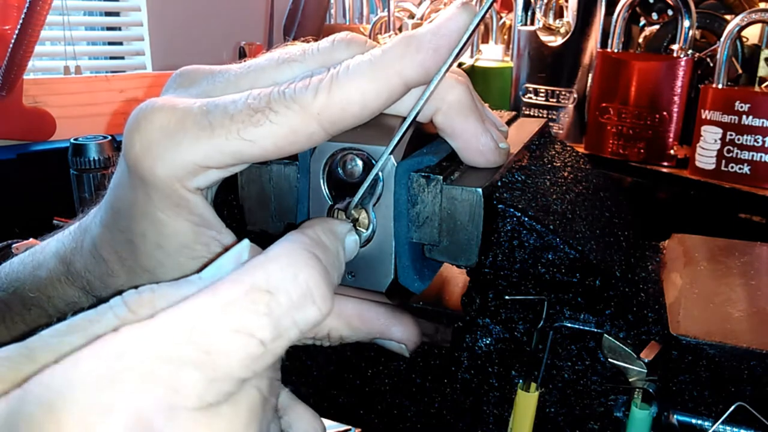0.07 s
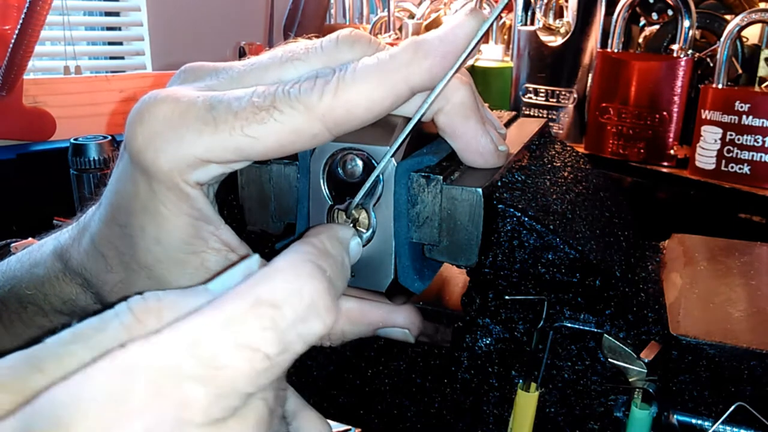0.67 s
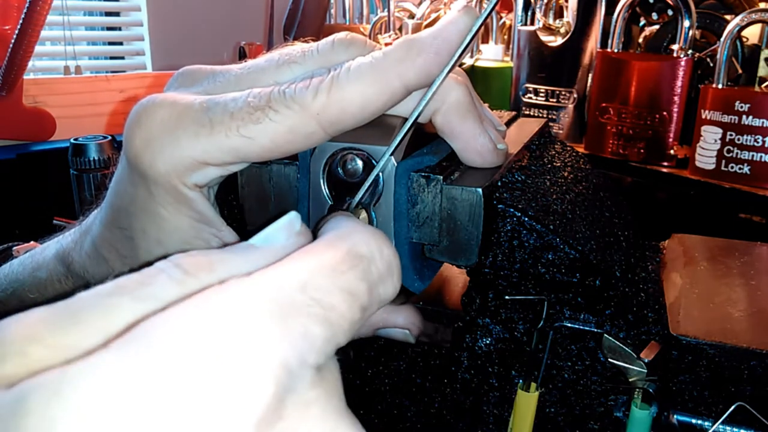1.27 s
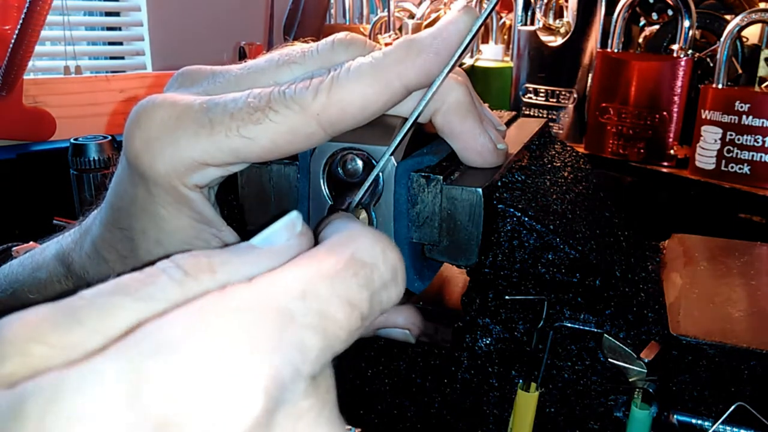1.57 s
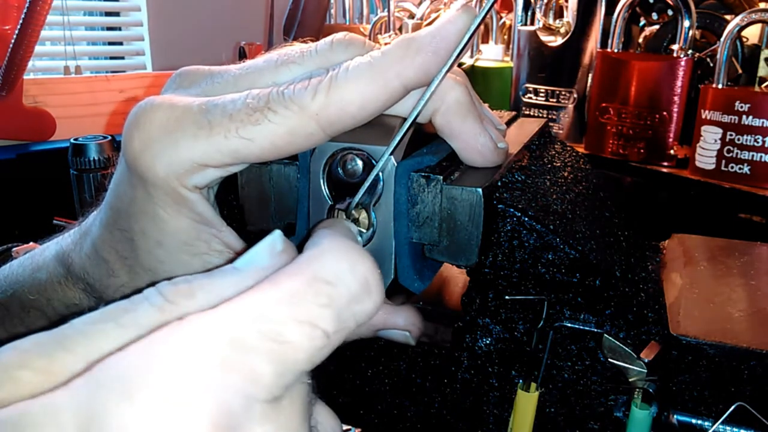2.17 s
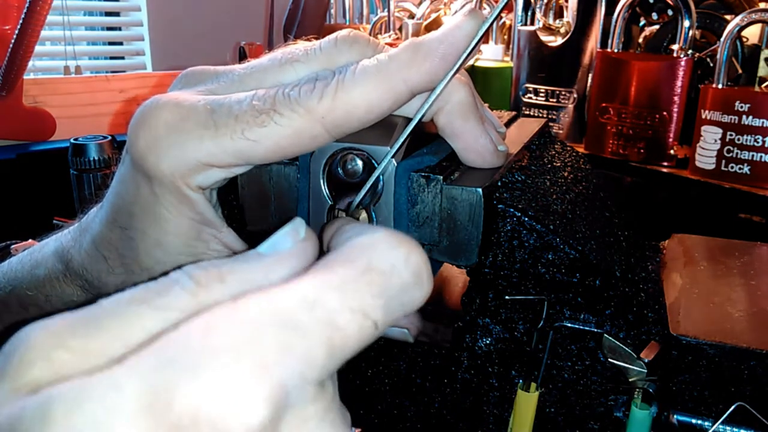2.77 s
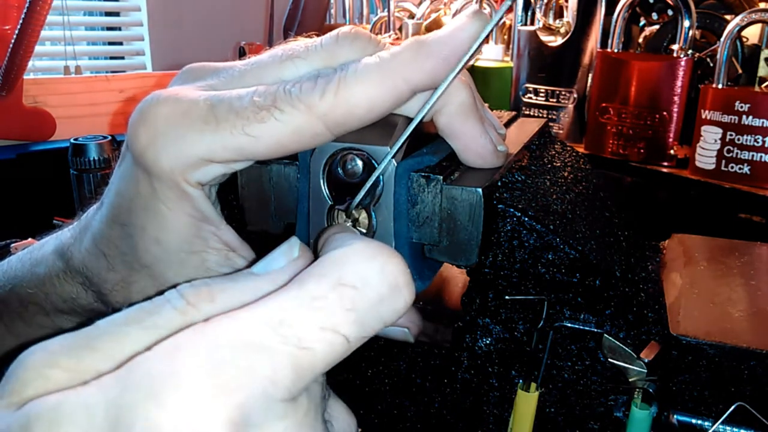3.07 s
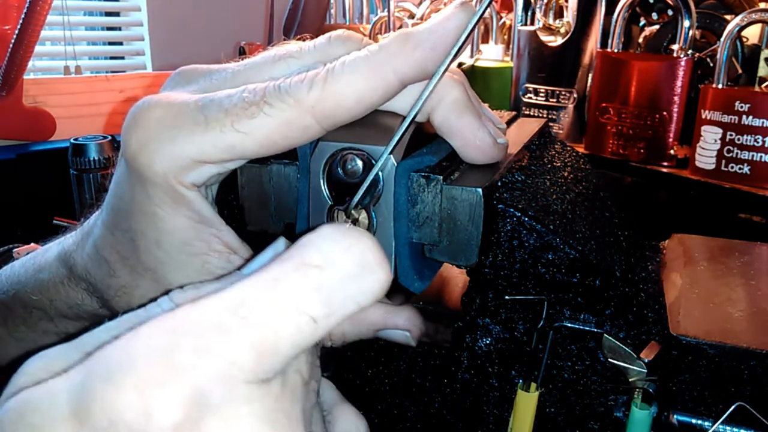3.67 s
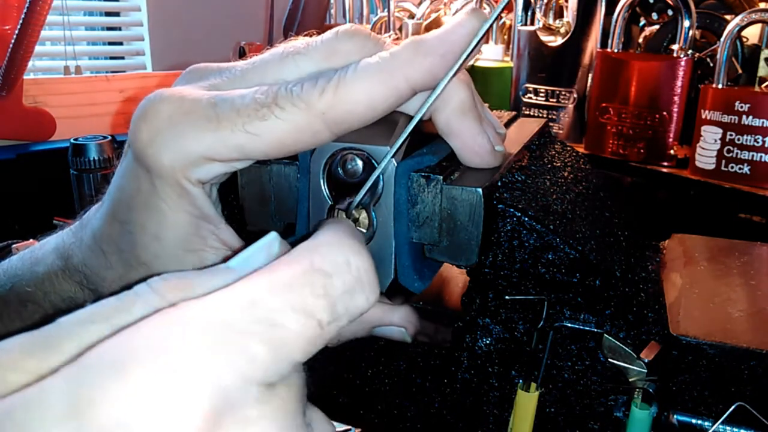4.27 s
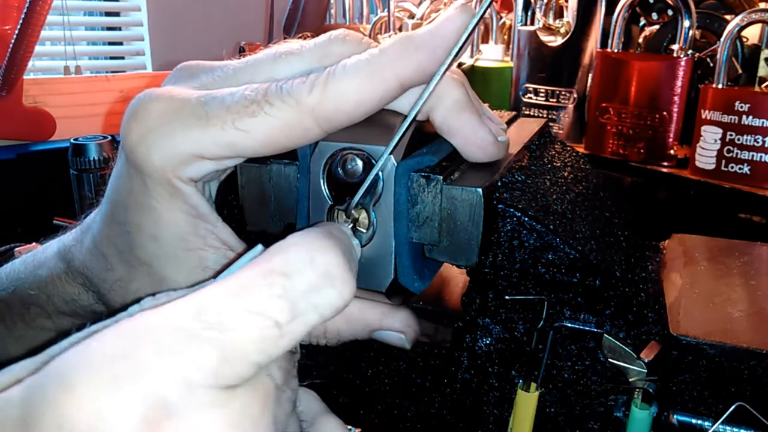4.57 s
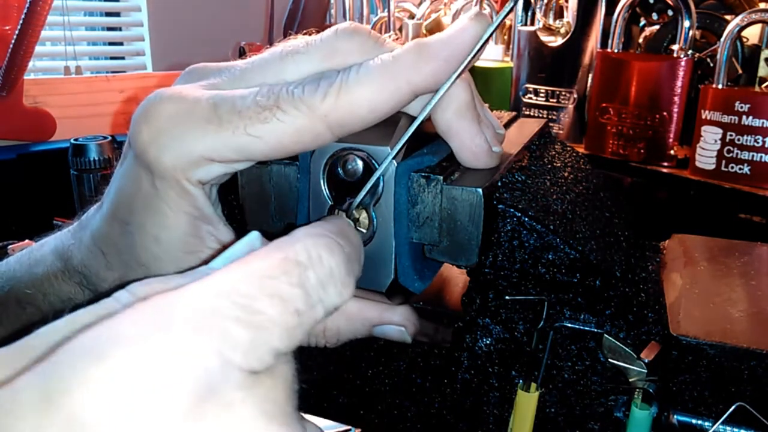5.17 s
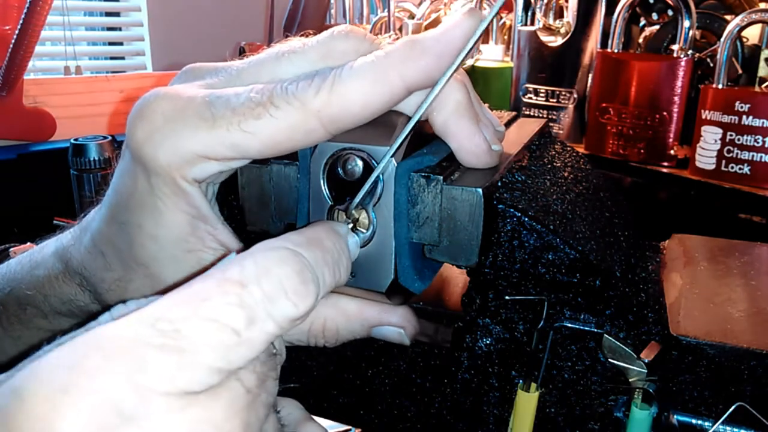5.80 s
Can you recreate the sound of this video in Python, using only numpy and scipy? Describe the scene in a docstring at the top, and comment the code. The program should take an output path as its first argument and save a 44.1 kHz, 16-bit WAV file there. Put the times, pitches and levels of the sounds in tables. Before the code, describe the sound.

A steel pick works the pins of a padlock clamped in a vise, making sharp, bright clicks at uneven intervals, some in pairs, some with a small dull knock underneath. Midway the tension wrench springs with a tiny ring. Near the end something briefly brushes the right side of the close stereo microphone with a low bump, and a few more clicks follow. Faint hum, rumble and hiss fill the small room.

```python
"""A small room: a steel pick works the pins of a padlock held in a vise, close to a stereo microphone.
Each pin lets go with a short chatter of steel on brass that rings the steel and jolts the vise.
The tension wrench springs once, hands drag on the lock, and once something brushes the right port.
Under it lie a low wavering hum, room rumble and the microphone's hiss."""
import sys
import numpy as np
from scipy import signal
from scipy.fft import rfft, irfft, next_fast_len
from scipy.io import wavfile
from scipy.ndimage import uniform_filter1d, map_coordinates

SR = 44100
rng = np.random.default_rng(int(sys.argv[2]) if len(sys.argv) > 2 else 0)


def store_pcm(level_fs):
    """Save levels as 16-bit WAV."""
    pcm = np.round(np.clip(level_fs, -1, 1) * 32767).astype(np.int16)
    wavfile.write(sys.argv[1], SR, np.atleast_2d(pcm).T)


N = 266143

# hum tones: f/Hz, level/dB, unsteady share
HUM_TONES = [(59.4, -52, 0.23), (228.8, -66, 0.61), (8302, -75.5, 0.74)]
# room rumble: f/Hz, relative density/dB
RUMBLE_SPECTRUM = [(20, -9), (35, -14), (55, 16), (75, 0), (100, 0), (140, 0.5), (175, -1), (215, -1.5),
                   (260, -9), (350, -11.5), (500, -15.5), (1000, -22.5), (2000, -55), (5000, -55)]
# rumble likeness at the two ports: f/Hz, correlation
RUMBLE_COHERENCE = [(60, 0.91), (130, 0.96), (290, 0.657), (640, 0.25), (1400, 0)]
# microphone hiss: f/Hz, relative density/dB
HISS_SPECTRUM = [(200, -8), (1500, -7), (4400, -5), (5600, -1.5), (6700, -5), (8200, -2), (10200, 0),
                 (12000, -3.5), (14100, -6), (14450, -36), (14900, -90)]
# room decay: f/Hz, t60/s
ROOM_DECAY = [(200, 0.86), (700, 0.25), (3000, 0.21), (8000, 0.27), (11000, 0.19), (15000, 0.22)]
# hand shifts: firmest drag t/s, relative level/dB, length/s
HAND_SHIFTS = [(1.836, -59, 0.12), (1.99, -58.5, 0.14), (2.673, -54.5, 0.049), (2.745, -65.5, 0.047),
               (4.51, -60, 0.09)]
# skin on the lock: f/Hz, relative density/dB
SKIN_SPECTRUM = [(120, -27), (270, -10), (370, 2), (520, -20), (850, -16), (1500, -42), (4000, -51)]
# scratch across the port: f/Hz, relative density/dB
SCRATCH_SPECTRUM = [(100, -23), (300, -8), (700, -8.5), (1400, -8.5), (1900, -2), (2500, -3), (3100, -14),
                    (5000, -12), (9000, -4), (12500, -8.5), (14200, -22), (15000, -50.5), (16000, -70)]
# dull rub on the port: f/Hz, relative density/dB
RUB_SPECTRUM = [(20, -4.5), (110, 6.5), (200, -8.5), (380, 4.5), (800, -10.5), (2000, -35)]
# vise modes: f/Hz, relative level/dB, t60/s
VISE_MODES = [(180, -1.5, 0.15), (236.6, -4.5, 0.1), (294, 1, 0.15), (375.5, -3, 0.11), (710, -0.5, 0.13)]
# tension wrench note: f/Hz, level/dB, t60/s
WRENCH_MODE = (708, -39.5, 0.07)
# modes of pick, wrench and lock body: f/Hz, width/Hz, relative level/dB
STEEL_MODES = [(1360, 356, -20.5), (2620, 470, -19), (5980, 200, -24), (7380, 210, -1.5), (8100, 443, -5),
               (9230, 330, 5.5), (9970, 230, 2), (10530, 662, 2.5), (12000, 500, -25), (12320, 263, 1),
               (13650, 130, -0.5)]
# dry crack of a contact: f/Hz, relative density/dB
CRACK_SPECTRUM = [(60, -74), (230, -17), (500, -26.5), (900, -28.5), (2000, -28.5), (3700, -22),
                  (4600, -16.5), (6500, -12), (10000, -5.5), (13500, -3.5), (14300, -24.5), (15200, -38),
                  (16800, -58)]
# band edges: knock top/Hz, low ring top/Hz, high ring foot/Hz
BAND_EDGES_HZ = (3800, 8500, 11500)
# pick on pin: t/s, level over 6 ms/dB, chatter/s, left-right/dB, body knock/dB, high ring/dB,
# favoured f/Hz
PIN_CONTACTS = [(0.3145,-14.5,0.0018,-4.5,-8,0,10600), (0.3208,-24,0.0032,8,-3.5,-5,10300),
                (0.482,-42.5,0.0023,-5,1,6,9400), (0.4947,-21.5,0.0014,-2.5,1.5,3,8900),
                (1.055,-41,0.003,-4.5,1,6,10900), (1.809,-14.5,0.0026,-2,0.5,4,12400),
                (2.1829,-29.5,0.0028,-5,-4,-9,9200), (2.1898,-9.5,0.004,-2,2.5,-2,1410),
                (2.216,-28.5,0.0047,2.5,-10,-4,9500), (2.621,-48.5,0.0027,0,28,5,7940),
                (2.6656,-39.5,0.0014,-2,19,8.5,7500), (2.7395,-21.5,0.0033,0.5,4,4.5,12500),
                (3.3593,-20,0.0027,-1,4.5,-1,9800), (4.086,-43,0.0035,-1.5,2,-4,7700),
                (4.182,-44,0.0014,-3,-1,1,12500), (4.282,-27,0.0039,-1,5.5,1.5,7720),
                (5.091,-38,0.0048,-4,7,-2,9900), (5.114,-18.5,0.0018,-3.5,-3,3.5,8700),
                (5.326,-45,0.0014,-3,12,-6,5170), (5.413,-30.5,0.0019,-2.5,6.5,2.5,7950),
                (5.5628,-24,0.0022,-5,7,1.5,9400)]
# pick on keyway: columns of PIN_CONTACTS without t/s
KEYWAY_GRAZE = (-49.5, 0.7, -12, -3, -3, 10400)


def amp(db):
    """Decibels to gain."""
    return 10 ** (np.asarray(db) / 20)


def unit(x):
    """Scale to rms 1."""
    return x / np.sqrt(np.mean(np.abs(x) ** 2) + 1e-20)


def along(points, hz):
    """Interpolate (f/Hz, value) points on a log axis."""
    f, v = np.transpose(points)
    return np.interp(np.log(hz + 1), np.log(f + 1), v)


def wobble(rate_hz):
    """Smooth random curve with knots at rate_hz."""
    knots = rng.standard_normal(int(N * rate_hz / SR) + 4)
    return map_coordinates(knots, [np.arange(N) * rate_hz / SR])


def filtered(x, response):
    """Apply a frequency response."""
    size = next_fast_len(N + SR // 2)
    return irfft(rfft(x, size) * response(np.fft.rfftfreq(size, 1 / SR)), size)[..., :N]


def noise(spectrum):
    """Two independent coloured noises, rms 1."""
    return unit(filtered(rng.standard_normal((2, N)), lambda hz: amp(along(spectrum, hz))))


def causal(gain):
    """Minimum-phase response: rings only after the blow."""
    cepstrum = irfft(np.log(np.maximum(gain, 1e-6)))
    half = cepstrum.shape[-1] // 2
    return np.exp(rfft(cepstrum * np.r_[1, np.full(half - 1, 2), 1, np.zeros(half - 1)]))


def add(track, sound, at_s):
    """Mix in a stereo sound."""
    start = round(at_s * SR)
    track[:, start:start + sound.shape[1]] += sound[:, :N - start]


def background(rumble_db=-55, hiss_db=-56.5, waver_hz=11):
    """Wavering mains hum, room rumble alike at both ports, independent hiss."""
    t = np.arange(N) / SR
    hum = 0
    for hz, db, unsteady in HUM_TONES:
        sway = unit(1 + unsteady * (wobble(waver_hz) + 1j * wobble(waver_hz)))
        hum = hum + amp(db) * np.sqrt(2) * np.real(sway * np.exp(2j * np.pi * hz * t))

    def mid_side_gains(hz):
        angle = np.arccos(np.clip(along(RUMBLE_COHERENCE, hz), -1, 1)) / 2
        return np.array([np.cos(angle), np.sin(angle)])

    mid, side = filtered(noise(RUMBLE_SPECTRUM), mid_side_gains)
    rumble = unit(np.array([mid + side, mid - side]))
    return hum + amp(rumble_db) * rumble + amp(hiss_db) * noise(HISS_SPECTRUM)


def room(x, tail_db=-14, low_db=3, delay_s=0.004):
    """Small-room reverberation: a fresh decaying noise tail for each quarter second of sound."""
    out, t = np.zeros((2, N)), np.arange(SR // 3) / SR
    for start in range(0, N, SR // 4):
        hz, frame_s, spectra = signal.stft(rng.standard_normal((2, len(t))), SR, nperseg=256)
        colour_db = low_db * (hz < BAND_EDGES_HZ[0])[:, None]
        decay_db = 60 * frame_s / along(ROOM_DECAY, hz)[:, None]
        tail = signal.istft(spectra * amp(colour_db - decay_db), SR, nperseg=256)[1]
        piece = x[:, start:start + SR // 4]
        at_s = start / SR + delay_s
        if at_s < (N - 1) / SR:
            add(out, signal.fftconvolve(piece, tail / np.linalg.norm(tail[0]), axes=1), at_s)
    return amp(tail_db) * out


def hands(gain_db=-1.5, grain_db=2, rise_share=0.48):
    """Skin drags dully and unevenly over the lock; each shift swells and eases off."""
    t = np.arange(N) / SR
    effort = 0
    for peak_s, db, length_s in HAND_SHIFTS:
        width_s = length_s * np.where(t < peak_s, rise_share, 1 - rise_share)
        effort = effort + amp(db) * np.exp(-((t - peak_s) / width_s) ** 2)
    mid, side = noise(SKIN_SPECTRUM)
    drag = unit(np.array([mid + 0.394 * side, mid - 0.36 * side]))
    return amp(gain_db + grain_db * wobble(rate_hz=60)) * effort * drag


def port_brush(start_s=4.9675, length_s=0.078, attack_s=0.017, slip_s=0.00079, grain_db=2):
    """A grainy stroke on the right port dulls as it presses in, then slips off with a snap."""
    scratch_db, scratch_t60_s, scratch_left_db = -24.5, 0.012, -20
    rub_db, rub_t60_s, rub_left_db, rub_growth_db_per_s = -34, 0.052, -6, 258
    t = np.maximum(np.arange(N) / SR - start_s, 0)
    onset = 1 - np.exp(-t / attack_s)
    to_go_s, past_s = np.maximum(length_s - t, 0), np.maximum(t - length_s, 0)
    snap_db = 2 * np.exp(-to_go_s / slip_s)
    scratch = onset * amp(scratch_db + snap_db - 60 * past_s / scratch_t60_s)
    rub = onset * amp(rub_db - rub_growth_db_per_s * to_go_s - 60 * past_s / rub_t60_s)
    fibres = unit(noise(SCRATCH_SPECTRUM) * amp(grain_db * wobble(rate_hz=900)))
    return (scratch * fibres * amp([[scratch_left_db], [0]])
            + rub * noise(RUB_SPECTRUM) * amp([[rub_left_db], [0]]))


def port_thump(at_s=5.028, hz=60, db=-24, t60_s=0.14, rise_s=0.0142, left_db=-8):
    """A brief damped low thump sounds at the right port as the brush presses in."""
    out, t = np.zeros((2, N)), np.arange(SR // 3) / SR
    swing = amp(db - 60 * t / t60_s) * (1 - np.exp(-(t / rise_s) ** 2))
    add(out, swing * np.sin(2 * np.pi * hz * t) * amp([[left_db], [0]]), at_s)
    return out


def vise(jolt_db=-40, tilt_db_per_octave=-2, rise_s=0.0014):
    """Each pin contact jolts the vise as hard as it knocks the lock body: a short dull thud."""
    out, t = np.zeros((2, N)), np.arange(SR // 3) / SR
    hz, mode_db, t60_s = np.transpose(VISE_MODES)[:, :, None]
    response_db = jolt_db + mode_db + tilt_db_per_octave * np.log2(hz / np.median(hz))
    for at_s, db, _, _, knock_db, _, _ in PIN_CONTACTS:
        level_db = db + knock_db + response_db + rng.standard_normal(hz.shape)
        phase = rng.uniform(0, 2 * np.pi, hz.shape)
        ring = np.sum(amp(level_db - 60 * t / t60_s) * np.sin(2 * np.pi * hz * t + phase), axis=0)
        add(out, np.array([ring, ring]) * (1 - np.exp(-t / rise_s)), at_s)
    return out


def wrench(at_s=3.369, rise_s=0.00554):
    """The tension wrench springs back and rings briefly on one note."""
    hz, db, t60_s = WRENCH_MODE
    t = np.maximum(np.arange(N) / SR - at_s, 0)
    return amp(db - 60 * t / t60_s) * (1 - np.exp(-(t / rise_s) ** 2)) * np.sin(2 * np.pi * hz * t)


def grazes(count=6, scatter_db=2):
    """Contact rows for faint scrapes of the pick on the keyway at random times."""
    db, *colour = KEYWAY_GRAZE
    times_s = (np.arange(count) + rng.uniform(0.1, 0.9, count)) / count * N / SR
    return [(at_s, db + scatter_db * rng.standard_normal(), *colour) for at_s in times_s]


def chatter(length_s, rise_s, size, bench_db=-19, bench_t60_s=0.069, coherence=0.44):
    """Spectra at both ports of a burst of tiny impacts, trailed by scatter from vise and bench."""
    t = np.arange(size) / SR
    draws = rng.standard_normal((3, size))
    impacts = np.sqrt(coherence) * draws[2] + np.sqrt(1 - coherence) * draws[:2]
    burst = np.exp(-(t / length_s) ** 2) + amp(bench_db - 60 * t / bench_t60_s)
    spectra = rfft(impacts * burst * (1 - np.exp(-(t / rise_s) ** 2)))
    # hard impacts feed all broad bands alike, leaving only narrow notches
    broad_power = np.abs(uniform_filter1d(np.abs(spectra) ** 2, size=220, axis=1))
    return spectra * causal(1 / np.sqrt(broad_power + 1e-12))


def steel_gain(hz, knock_db, high_db, favoured_hz, detune=0.019, favour_db=5, favour_width_hz=450):
    """Dry crack plus steel modes; where the pick bears decides which ring most."""
    power = amp(along(CRACK_SPECTRUM, hz)) ** 2
    for mode_hz, width_hz, mode_db in STEEL_MODES:
        centre_hz = mode_hz * (1 + detune * rng.standard_normal())
        power = power + amp(mode_db) ** 2 / (1 + ((hz - centre_hz) / width_hz) ** 2) ** 2
    low_db = 1.5 + 0.42 * knock_db  # a body knock also rings the lower modes more
    knock_top_hz, low_top_hz, high_foot_hz = BAND_EDGES_HZ
    bands = [hz < knock_top_hz, hz < low_top_hz, hz > high_foot_hz]
    band_db = uniform_filter1d(np.select(bands, [knock_db, low_db, high_db], 0.), size=90)
    peak_db = favour_db / (1 + ((hz - favoured_hz) / favour_width_hz) ** 2)
    return np.sqrt(power) * amp(band_db + peak_db)


def pick_clicks(contacts, left_lag_s=0.0001596, rise_share=0.38, level_span_s=0.006, size=4096):
    """Each contact chatters into the steel's modes, slightly nearer the right port."""
    out, hz = np.zeros((2, N)), np.fft.rfftfreq(size, 1 / SR)
    port_delay = np.exp(-2j * np.pi * hz * [[left_lag_s], [0]])
    for at_s, db, length_s, pan_db, knock_db, high_db, favoured_hz in contacts:
        steel = causal(steel_gain(hz, knock_db, high_db, favoured_hz))
        rise_s = rise_share * length_s  # a long scrape starts more softly than a snap
        click = irfft(chatter(length_s, rise_s, size) * steel * port_delay)[:, :size // 2]
        span_rms = np.sqrt(np.sum(click ** 2, axis=1, keepdims=True) / (level_span_s * SR))
        pan = unit(amp([[pan_db], [0]]))
        add(out, amp(db) * pan * click / span_rms, at_s - rise_s)
    return out


def scene():
    """Lock and room, vise, hands, brushed microphone, background."""
    lock = pick_clicks(PIN_CONTACTS + grazes()) + wrench()
    return lock + room(lock) + vise() + hands() + port_brush() + port_thump() + background()


def record(dry, top_hz=16700):
    """Soft limiting at full scale, then a hard band limit."""
    limited = dry / (1 + np.abs(dry) ** 8) ** (1 / 8)
    return filtered(limited, lambda hz: hz < top_hz)


dry = scene()
out = record(dry)
store_pcm(out)
```